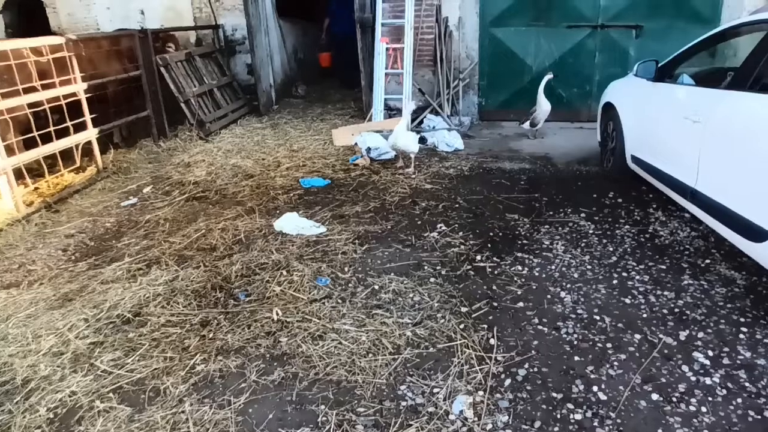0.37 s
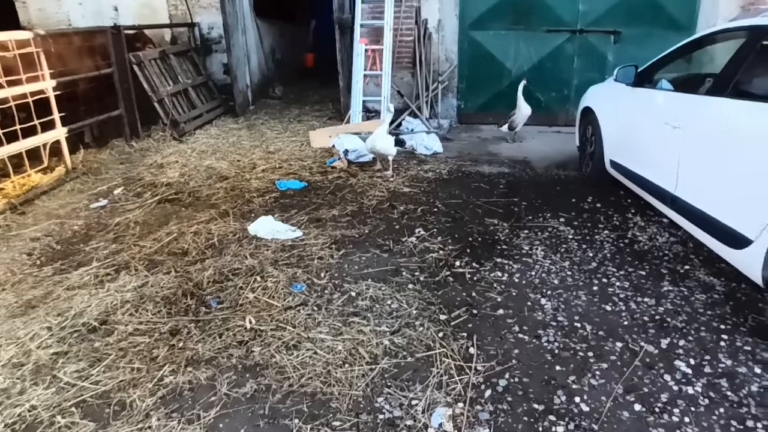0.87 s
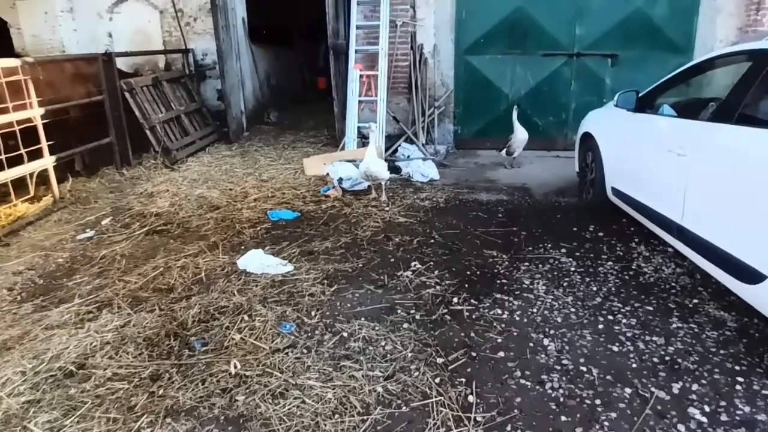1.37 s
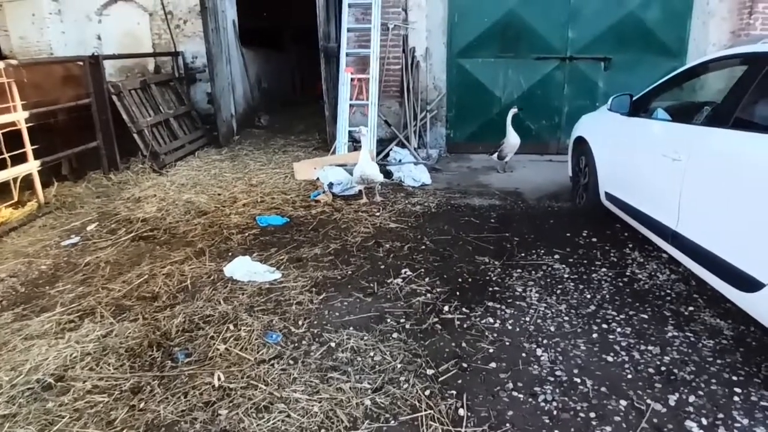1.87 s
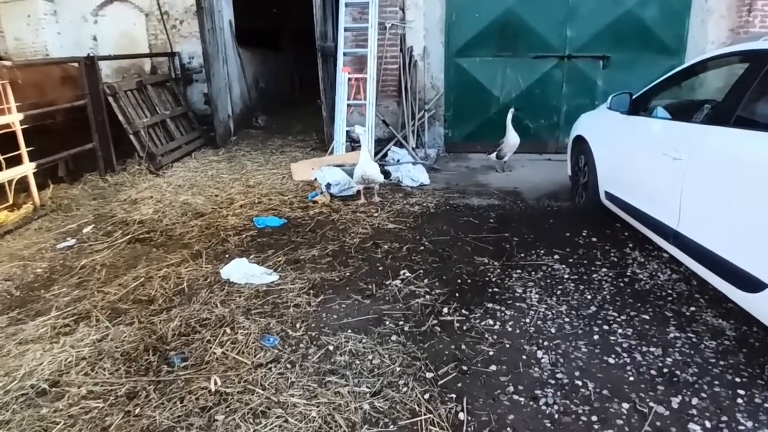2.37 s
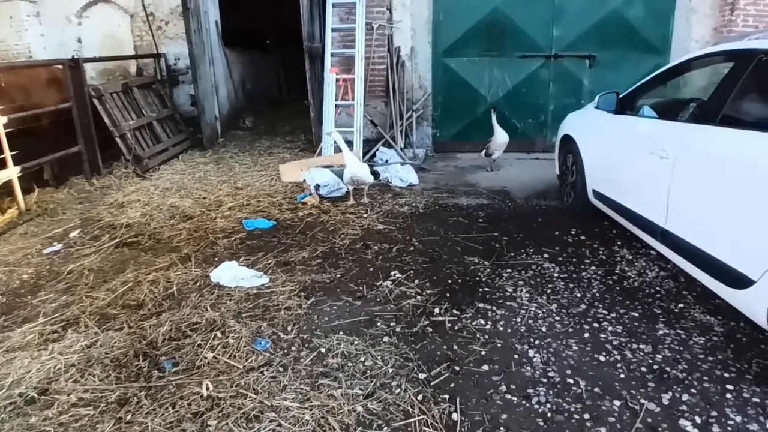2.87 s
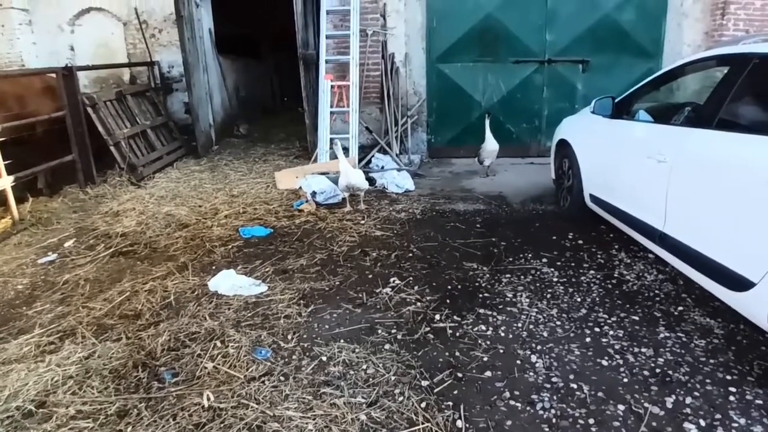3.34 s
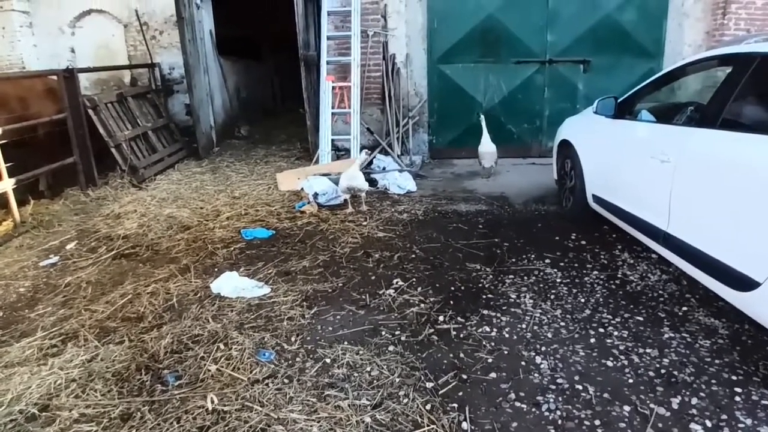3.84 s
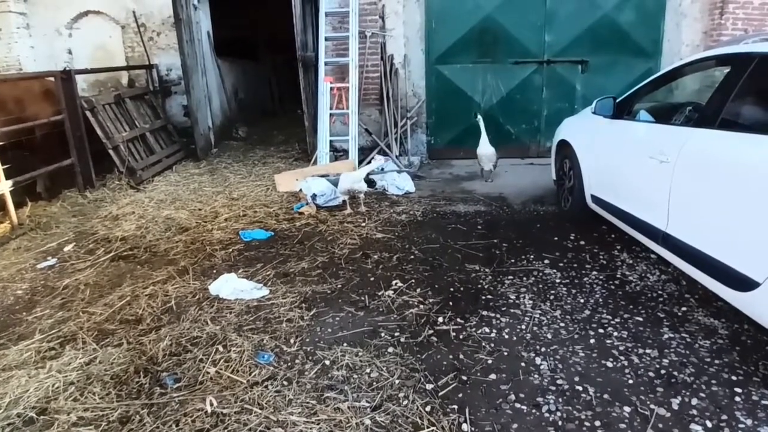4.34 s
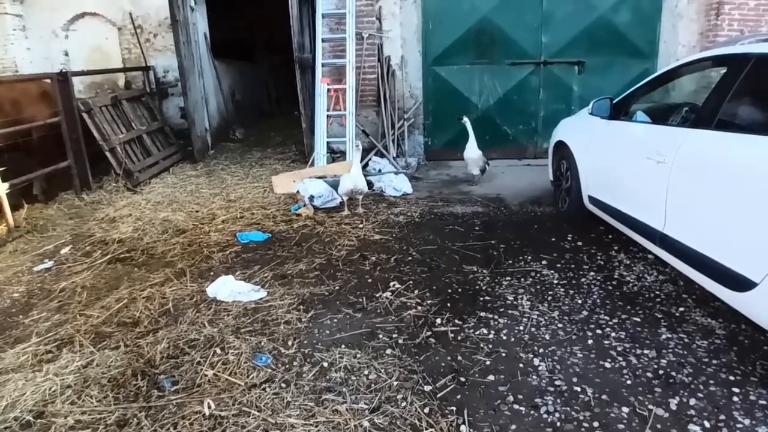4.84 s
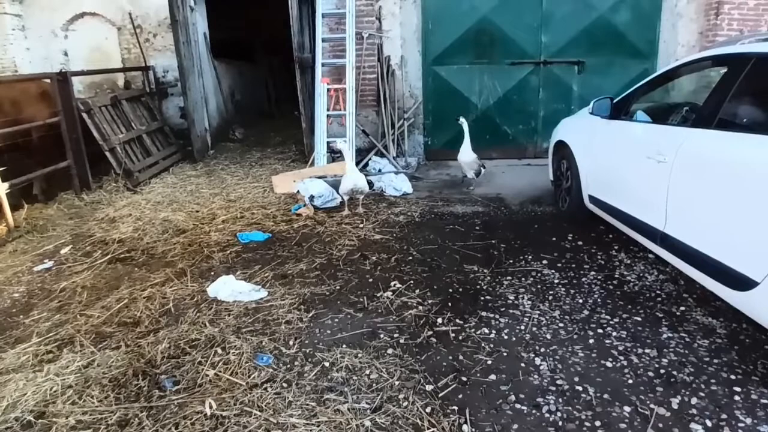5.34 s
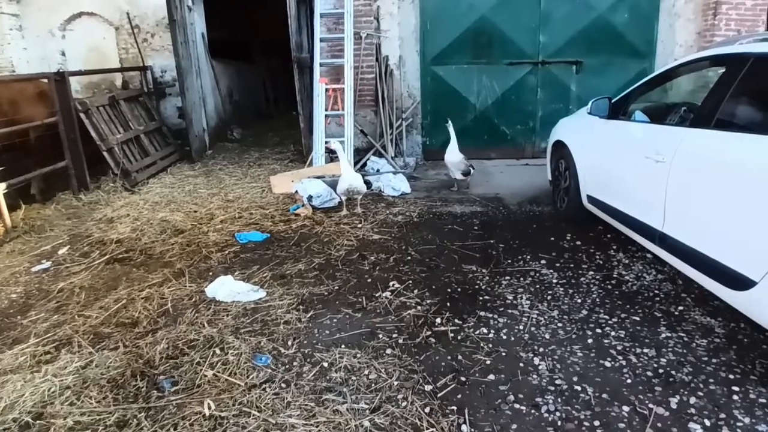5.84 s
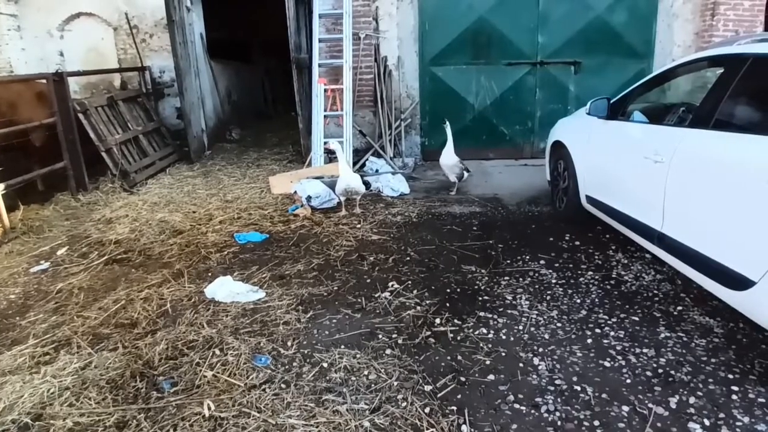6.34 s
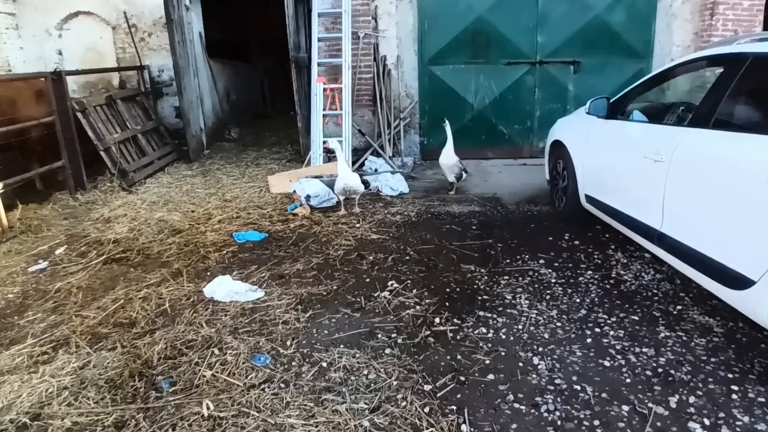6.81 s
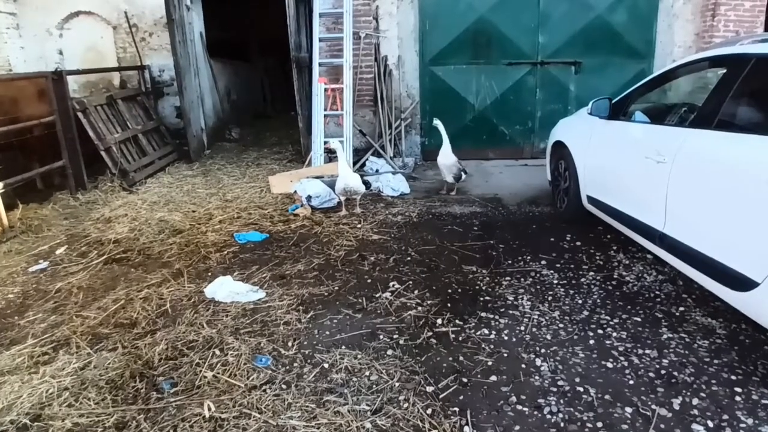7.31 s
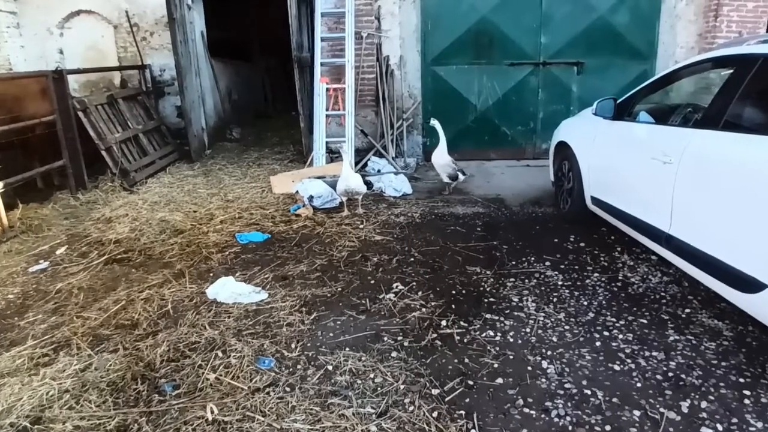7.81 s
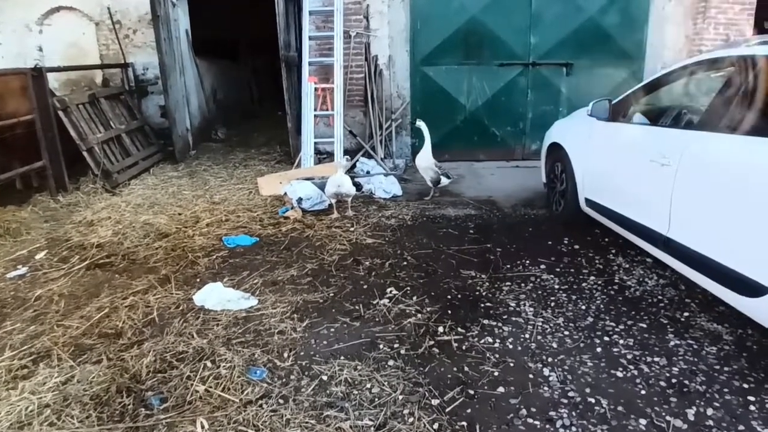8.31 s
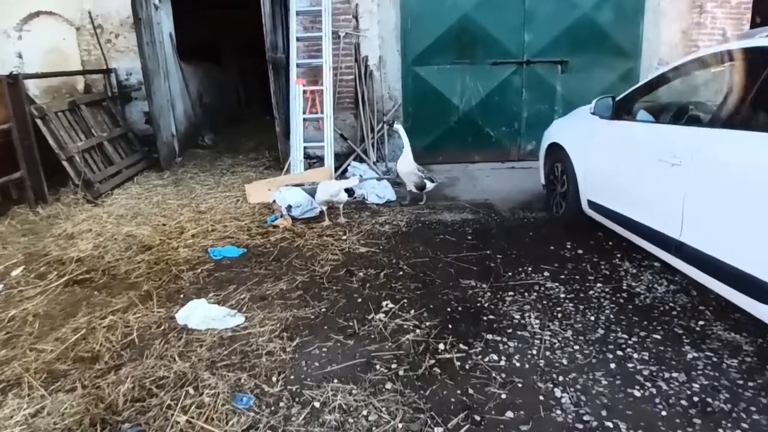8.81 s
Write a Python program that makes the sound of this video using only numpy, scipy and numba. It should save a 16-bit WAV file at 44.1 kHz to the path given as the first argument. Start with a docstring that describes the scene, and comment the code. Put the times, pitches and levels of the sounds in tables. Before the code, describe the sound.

Two geese honk loudly and harshly close by in a walled farmyard, with a short low from a calf, straw rustle and a late run of barks.

```python
"""In a walled farmyard two geese call close by, a calf lows in the pen, and straw rustles under wind and hiss.
The geese snap two membranes into a ringing windpipe, throat and beak: rolled calls, harsh honks, barks.
Wavering near-sines make windpipe tones, soft coos, low hums and small birds; the calf is pulses, nose and mouth.
Shaped noise makes wind bumps, rustle, hiss, ticks and scuffles; the walls answer with a dull tail and bright scatter."""
import sys
import numpy as np
from scipy import signal
from scipy.fft import rfft, irfft
from scipy.io import wavfile
from scipy.ndimage import uniform_filter1d, minimum_filter1d
from numba import njit

SR = 44100
rng = np.random.default_rng(int(sys.argv[2]) if len(sys.argv) > 2 else 0)


def boost(x):
    """Linear amplitude factor 10**(x/20) for a level x in decibels (scalar or array-like)."""
    u = np.asarray(x, float) / 20
    return 10 ** u


def waveform_to_disk(signal):
    """Save audio, clipped to [-1, 1], as 16-bit WAV at the path in sys.argv[1]."""
    frames = np.transpose(np.atleast_2d(signal))
    scaled = np.clip(frames, -1, 1) * 32767
    samples = np.round(scaled).astype(np.int16)
    wavfile.write(sys.argv[1], SR, samples)


N = 404838
T = np.arange(N) / SR
HZ = np.fft.rfftfreq(N, 1 / SR)

# Wind bumps on the ports. Each row: start in seconds, level in dB before a halving of the amplitude.
BUMPS = [(0.629, -62), (0.849, -45), (1.255, -56), (2.424, -62), (2.61, -50), (2.839, -47), (3.099, -52.5),
         (3.362, -61), (3.608, -39), (3.801, -42), (4.491, -51), (4.979, -48.5), (5.292, -51), (5.502, -36),
         (5.887, -43), (6.34, -38.5), (6.441, -63), (6.634, -52), (6.81, -43), (7.263, -45), (7.712, -41),
         (7.93, -42.5), (8.173, -38.5), (8.344, -41), (8.635, -43), (8.835, -58), (9.089, -42)]
# Animals stirring in the pens. Each row: time in seconds, dull rustle in dB, straw in dB.
RUSTLE = [(.5, -63.5, -44), (1.33, -51.5, -51.5), (1.55, -40.5, -39.5), (1.66, -54, -50.5),
          (3.06, -53.5, -51.5), (3.49, -56.5, -57), (3.95, -42.5, -32), (4.3, -38.5, -46),
          (4.75, -49.5, -47.5), (5.5, -52.5, -54), (5.7, -58.5, -59.5), (6.1, -56.5, -56), (6.8, -59, -57),
          (6.92, -62, -49.5), (7.1, -58.5, -55), (7.25, -49, -53), (7.45, -59.5, -57.5), (8.58, -57, -59.5),
          (8.75, -49.5, -45), (8.9, -59, -58), (9.18, -59, -51)]
# Leafy hiss. Each row: time in seconds, level in dB.
HISS = [(0.46, -84.5), (0.63, -58.5), (1.26, -63.5), (3.49, -59.5), (3.64, -55.5), (3.74, -62), (3.85, -49),
        (4.22, -61.5), (5.0, -65), (5.9, -70.5), (6.1, -65), (6.29, -52), (6.36, -62.5), (7.0, -69),
        (7.3, -64.5), (8.57, -68), (8.64, -57), (9.03, -66), (9.18, -55.5)]
# Spectra of yard and hiss, set to level later. Each row: frequency in Hz, relative density in dB per Hz.
YARD_COLOUR = [(18, -44.5), (30, -14.5), (76, 0.5), (295, -2), (399, -9.5), (648, -2), (1050, -18),
               (1490, -12), (2100, -17), (2910, -24.5), (7500, -34), (9750, -59.5), (16500, -120)]
HISS_COLOUR = [(4710, -35), (8000, -19.5), (9490, -12.5), (9690, -11.5), (10900, -1.5), (11500, -2.5),
               (13400, -18.5), (15100, -4.5), (16000, -23.5)]
# How alike the yard noise is at both ports. Each row: frequency in Hz, left-right likeness from -1 to 1.
LIKENESS = [(60, .97), (130, .95), (290, .85), (640, .4), (1410, -.1), (3100, -.2), (7000, 0)]
# Clear rolled calls, one list each. Each row: time in seconds, pulse rate in Hz, level in dB, chest hum in dB.
CLEAR = [
    [(0.48, 154.5, -76, -88), (0.554, 158.5, -37, -63), (0.622, 165.5, -19, -48),
     (0.688, 170.9, -19.5, -62), (0.725, 169.8, -22, -65), (0.74, 167.6, -31.5, -60),
     (0.78, 165.3, -40, -66)],
    [(2.112, 176.7, -67, -59), (2.135, 179.2, -31.5, -60), (2.2, 190.9, -21.5, -45.5),
     (2.264, 198.8, -20, -32), (2.336, 192, -23.5, -43.5), (2.355, 190.2, -34, -53.5),
     (2.39, 195.6, -46, -63)],
]
# Long honks, one list each. Each row: time in seconds, pulse rate in Hz, level in dB,
# brightness of the honk (0 dull, 1 bright, below 0 darker still), chest hum in dB.
LONG = [
    [(0.806, 152.6, -31.5, 0.03, -63), (0.82, 158.5, -16.5, 0.06, -37.5), (0.9, 159.9, -15, 0.64, -51),
     (0.986, 163.3, -13, 0.73, -59), (1.06, 170, -11.5, 0.5, -57.5), (1.126, 175.3, -10.5, 0.04, -50.5),
     (1.172, 149.8, -20.5, 0.04, -33), (1.24, 137.6, -57, 0, -59)],
    [(2.412, 157.7, -40, 0.18, -72), (2.428, 149.9, -9.5, 0, -41), (2.467, 160.8, -16, 0.53, -32),
     (2.567, 153.6, -18, 0.75, -64.5), (2.685, 157.7, -20, .25, -35.5)],
    [(2.69, 148.2, -10, 0.47, -29), (2.746, 155.8, -16.5, 0, -27), (2.83, 141.5, -27.5, -.2, -35),
     (2.908, 126.9, -31.5, -.4, -45), (2.942, 135.5, -35, -.4, -34), (3.02, 132.5, -50, -.5, -75)],
]
# Roughness of the calls by the ladder, in order of time. Each row: roughness 0-1 at the edges, in the middle.
LADDER_ROUGH = [(.5, .15), (.43, .8), (.52, .18), (.55, .83), (.4, .13)]
# Overall spectrum of each kind of call as heard; the barks are dull above 8 kHz.
# Each row: frequency in Hz, relative level in dB.
CLEAR_COLOUR = [(260, -62.5), (450, -32), (590, -35), (745, -16), (964, -17), (1280, 2.5), (1380, 0.5),
                (1620, -4), (1990, -15.5), (2400, -20), (2740, -21.5), (3220, -18.5), (4270, -22.5),
                (6250, -33.5), (8500, -60.5), (11000, -86.5), (18700, -120)]
LONG_COLOUR = [(260, -72), (450, -28.5), (636, -24.5), (912, -1), (1270, -7.5), (1450, -5), (1690, -34),
               (2940, -26.5), (3520, -22), (4090, -17.5), (6050, -22), (9490, -27), (11700, -17),
               (15300, -39), (16300, -49)]
BARK_COLOUR = [(240, -79), (400, -1), (1010, -11.5), (1160, -21.5), (1260, -15.5), (1360, -15.5),
               (2290, -21), (2820, -24), (3300, -23), (3660, -17), (4750, -26.5), (7120, -28.5),
               (9000, -74), (11700, -101), (19800, -120)]
# Soft coos and low hums. Each row: crest in seconds, rise in seconds, fall in seconds, pitch in Hz, level in dB.
COOS_AND_HUMS = [(0.726, .07, 0.024, 504.6, -40.5), (2.5, .05, 0.15, 442, -39), (3.8, .07, .09, 187.8, -33),
                 (4.91, .02, .03, 862, -50), (5.12, .03, .03, 675, -53), (5.3, .03, 0.027, 546, -54),
                 (6.2, .03, 0.064, 804.6, -47.5), (6.53, 0.074, 0.11, 539, -48.5),
                 (7.132, .1, .06, 113.1, -45.5), (7.21, .03, .04, 715, -53),
                 (7.458, .035, 0.049, 697, -49.5), (8.41, 0.081, 0.11, 693, -52.5)]
# Tones ringing in the windpipe. Each row: crest in seconds, rise in seconds, fall in seconds,
# pitch at the crest in Hz, level in dB, octave above in dB relative to that level.
PIPE_TONES = [(0.878, 0.052, 0.059, 823.3, -10.5, -29), (0.966, 0.12, 0.067, 1072, -2.5, -34),
              (1.02, 0.16, 0.065, 1493, 0.5, -9.5), (1.1, 0.039, 0.076, 955, -2.5, -25),
              (2.482, 0.065, 0.19, 1159, -15.5, -27.5), (2.616, .1, 0.088, 1451, -8.5, -8),
              (2.65, 0.031, .1, 936.4, -7, -30), (3.845, .04, 0.018, 902, -19.5, -26),
              (7.75, .06, .13, 1280, -29.5, -24), (7.764, .085, 0.031, 981, -17.5, -25)]
# Barks. Each row: start in seconds, time held in seconds (stretched if very short), crest level in dB,
# throat resonance in Hz, beak resonance in Hz, brightness in dB.
BARKS = [(1.25, .05, -35, 1197, 2600, -1.5), (1.43, 0.055, -37, 690, 2650, 2.5),
         (1.885, 0.062, -35.5, 800, 2650, -5), (3.305, 0.068, -11.5, 867, 2220, -1),
         (3.535, .09, -18.5, 921, 2150, 0.5), (3.732, .022, -23.5, 1440, 2081, -5.5),
         (3.764, 0.071, -21, 784, 2223, 7), (4.006, 0.032, -13.5, 1570, 1920, -3.5),
         (6.607, .025, -31.5, 735, 2280, -12.5), (7.67, .11, -15, 991, 2597, 0.5),
         (8.205, 0.04, -35.5, 701, 2820, -14.5), (8.636, 0.059, -28.5, 704, 2100, 2),
         (8.729, 0.11, -44, 757, 2050, -16), (8.944, .05, -27, 667, 2230, -4.5),
         (9.071, 0.041, -34.5, 876, 2090, 0), (9.135, 0.064, -21, 725, 2215, -4)]
# Shoving in the straw. Each row: start of the held part in seconds, time held in seconds, level in dB.
SCUFFLE = [(1.47, 0.069, -34), (2.701, 0.1, -36.5), (2.929, 0.0373, -33), (3.638, 0.0043, -37),
           (3.94, 0.0095, -39)]
# Ticks and scuffs of feet and straw. Each row: start in seconds, level in dB before a halving of the amplitude,
# nominal centre in Hz, time to fall 60 dB in seconds.
TICKS = [(1.598, -47, 5000, 0.3), (1.7094, -39, 8920, 0.074), (1.7535, -39.5, 11840, 0.049),
         (1.7714, -37, 11620, 0.049), (3.1826, -32, 6090, 0.14), (3.263, -36, 1600, .09),
         (3.659, -34, 2117, 0.07), (3.926, -13, 1601, 0.083), (4.9938, -35.5, 1930, 0.086),
         (5.4252, -35, 2880, 0.21), (5.7114, -38, 1380, 0.31), (5.9366, -44, 1540, 0.0694),
         (6.1413, -45.5, 1950, 0.17), (6.343, -35.5, 11820, 0.039), (6.6134, -32, 1690, 0.088),
         (6.7216, -39.5, 1540, 0.099), (6.8563, -35.5, 4920, 0.39), (7.1392, -34, 8020, 0.17),
         (7.5792, -47, 10630, 0.082), (8.4002, -50, 1900, 0.072)]
# Far small birds. Each row: crest in seconds, rise in seconds, fall in seconds, pitch at the crest in Hz, level in dB.
CHIRPS = [(1.62, 0.031, 0.0464, 5300, -50.5), (1.69, 0.033, .03, 4450, -53.5),
          (6.482, .03, 0.053, 3160, -65.5), (7.37, .08, .11, 3388, -63.5), (8.23, .02, 0.037, 2655, -50.5)]
# The calf. Each row: time in seconds, pitch in Hz, nasal hum in dB, open mouth in dB.
CALF = [(3.66, 95.8, -75, -65), (3.704, 98.9, -62.5, -72), (3.804, 109.2, -86, -78),
        (3.89, 126.3, -45.5, -32.5), (3.94, 132, -33.5, -33.5), (4.234, 146.3, -30.5, -29),
        (4.43, 151.1, -27.5, -29), (4.598, 142.7, -35.5, -41.5), (4.72, 124.5, -69, -48)]
# Spectrum of the calf's low. Each row: frequency in Hz, relative level in dB.
CALF_COLOUR = [(76, -45), (130, -32), (208, -30), (303, 2), (450, -6), (674, -40), (845, -11.5), (1010, -6),
               (1160, 5.5), (1520, 13), (1690, -10), (1970, 14.5), (2260, -5.5), (2700, -7.5), (3050, -29),
               (4800, -33.5), (6240, -71), (10600, -120)]
# Port phase for each place. Each row: frequency in Hz, lead of the left port in radians.
LADDER_PHASE = [(0, 0), (430, -.3), (1810, 2.0), (2930, 2.3), (4050, 1.3), (5860, 2.2), (8010, 6.6),
                (16000, 11)]
GATE_PHASE = [(0, 0), (1640, .6), (3700, -.7), (5770, .3), (16000, .3)]
PEN_PHASE = [(0, 0), (1000, -.5), (2580, -1.5), (3500, -2.4), (16000, -12)]
# Port balance for each place. Each row: frequency in Hz, left minus right in dB.
LADDER_BALANCE = [(60, -0.5), (110, -0.5), (200, -0.5), (380, -0.5), (700, -3.0), (1290, -1.5), (2380, 3.5),
                  (4400, 0.5), (8120, -5.0), (15000, -6.5)]
GATE_BALANCE = [(60, -0.5), (110, -0.5), (200, 0.5), (380, -0.5), (700, 0.0), (1290, 1.0), (2380, 4.0),
                (4400, 0.5), (8120, -3.0), (15000, -4.5)]
PEN_BALANCE = [(60, -1.5), (110, -1.0), (200, 0.0), (380, 1.0), (700, -2.0), (1290, -1.5), (2380, 1.0),
               (4400, 0.5), (8120, -2.5), (15000, -4.5)]

OPPOSITE = np.array([[1], [-1]])  # one signal in opposite polarity at the two ports


def unit(x):
    """Scale to rms 1."""
    return x / np.sqrt(np.mean(x ** 2) + 1e-18)


def on_log(table):
    """Read a (Hz, value) table at every frequency, straight on a log axis."""
    hz, value = np.transpose(table)
    return np.interp(np.log(HZ + 1), np.log(hz + 1), value)


def colour(x, table):
    """Filter by a (Hz, dB) table."""
    return irfft(rfft(x) * boost(on_log(table)), N)


def band(x, lo_hz, hi_hz):
    """Steep band-pass."""
    return signal.sosfilt(signal.butter(3, [lo_hz, hi_hz], "band", fs=SR, output="sos"), x)


def steady(x):
    """Even out the slow level, keep the pulses."""
    power = uniform_filter1d(uniform_filter1d(x ** 2, size=1300), size=1300)
    return x / np.sqrt(power + 1e-12)


def walk(rate):
    """Random levels held 1 / rate seconds and slewed twice; spread near 1."""
    k = int(SR / rate)
    held = np.repeat(rng.standard_normal(N // k + 1), k)
    return 1.3 * uniform_filter1d(uniform_filter1d(held, k), k)[:N]


def played(calls, tail_s=0.0097):
    """Columns of a list of calls as curves, and a gate that is open during the calls."""
    s, *columns = np.transpose(np.concatenate(calls))
    gate = np.zeros(N)
    for call in calls:
        start, end = call[0][0], call[-1][0]
        gate += np.interp(T, [start - .004, start, end, end + tail_s], [0, 1, 1, 0])
    return [np.interp(T, s, c) for c in columns], np.minimum(gate, 1)


def gusts():
    """Level curve of the wind: low and steady, with bumps that rise quickly and die away."""
    wind_db, rise_s, t60_s = -65.5, 0.027, .4
    t, starts = T[:SR], np.zeros(N)
    s, level_db = np.transpose(BUMPS)
    starts[(s * SR).astype(int)] = .5 * boost(level_db)
    shape = np.minimum(t / rise_s, 1) * boost(-60 * np.maximum(t - rise_s, 0) / t60_s)
    return boost(wind_db) + signal.fftconvolve(starts, shape)[:N]


def crackle():
    """Dry straw: scattered clicks of very uneven size, each smeared into a short hiss."""
    clicks_per_s, spread_db, t60_s = 36, 6, .03
    size = boost(spread_db * np.minimum(rng.exponential(size=N), 3))
    clicks = (rng.random(N) < clicks_per_s / SR) * size
    smeared = signal.lfilter([1], [1, -boost(-60 / (t60_s * SR))], clicks)
    return smeared * rng.standard_normal((2, N))


def yard():
    """Wind bumps below, rustle in the middle, hiss on top; half-octave noise bands flicker on their own."""
    (hiss_db,), _ = played([HISS])
    (dull_db, straw_db), _ = played([RUSTLE])
    like = np.clip(on_log(LIKENESS), -1, 1)
    # the more alike the ports, the more mid and the less side
    mid, side = (rfft(rng.standard_normal(N)) * boost(on_log(YARD_COLOUR)) * np.sqrt(1 + sign * like)
                 for sign in (1, -1))
    pair = irfft(np.array([mid + side, mid - side]), N)
    wind = gusts() * boost(1.3 * walk(8.1)) * unit(band(pair, 44, 81))
    bands = [boost(3.2 * walk(9)) * band(pair, hz, hz * np.sqrt(2)) for hz in 100 * 2 ** np.arange(0, 6.5, .5)]
    dull, straw = unit(sum(bands[:6])), unit(sum(bands[6:]))
    hiss = unit(colour(rng.standard_normal((2, N)) + boost(-6) * unit(crackle()), HISS_COLOUR))
    hiss_level = boost(hiss_db + 0.8 * walk(26) + 1.7 * walk(7.9))
    return wind + boost(dull_db) * dull + boost(straw_db) * straw + hiss_level * hiss


@njit
def ring(x, hz, width):
    """Resonance with a moving centre and a width in Hz: a state-variable band-pass."""
    y, b, l = np.empty(len(x)), 0., 0.
    for i in range(len(x)):
        g, k = np.tan(np.pi * hz[i] / SR), width / hz[i]
        v = (b + g * (x[i] - l)) / (1 + g * (g + k))
        b, l, y[i] = 2 * v - b, l + 2 * g * v, k * v
    return y


def snapping(hz, on):
    """One snap per cycle; upper partials leave the long neck out of step, which blunts it."""
    turns, snaps = np.cumsum(hz) / SR, np.zeros(N)
    offsets = 1.76 * np.cumsum(rng.standard_normal(80)) / 2
    partials = range(1, int(8000 / hz[on].mean()))
    snaps[on] = unit(sum(np.cos(2 * np.pi * k * turns[on] + offsets[k]) for k in partials))
    return snaps, turns


def membranes(hz, rough, on):
    """The leading membrane, and the harsh part: its partner beating out of tune plus puffs of air."""
    snaps, turns = snapping(hz * (1 + .053 * rough * walk(90)), on)
    partner, _ = snapping(hz * (1.37 + .035 * walk(45)), on)
    air = unit(np.exp(-(turns % 1) / .94) * rng.standard_normal(N))  # each puff fades over its cycle
    harsh = .8 * partner * boost(4 * walk(120)) + .75 * air
    return snaps * boost(5 * rough * walk(150)), harsh, turns


def goose(calls, shape, rough, width_hz, ring_db, beak_width_hz, beak_ring_db, pipe_db,
          pipe_hz=None, head=None, hollow=None):
    """Snaps through a windpipe that rings on multiples of its lowest mode, throat and beak; the chest hums."""
    (hz, level_db, throat_hz, beak_db, beak_hz, rasp_db, chest_db), gate = played(calls)
    snaps, harsh, turns = membranes(hz, rough, gate > 0)
    snaps, harsh = colour(snaps, shape), colour(harsh, shape)
    voice = (1 - rough) * snaps + rough * harsh
    # a stretched neck holds the pipe near one pitch; without a given pitch it follows the throat
    pipe = throat_hz if pipe_hz is None else pipe_hz * (1 + .035 * walk(12))
    # each mode wanders and flickers on its own; higher ones are wider
    modes = (boost(5 * walk(25)) * ring(voice, k * pipe * (1 + .03 * walk(20)), 60. * k + 40)
             for k in range(2, 7))
    voice = voice + boost(pipe_db) * sum(modes)
    low, middle = band(voice, 510, 1900), band(voice, 1800, 2484)
    if hollow:
        low = low - hollow * ring(low, .5 * throat_hz, 500.)  # little sound leaves below the throat resonance
    throat = steady(low + boost(ring_db) * ring(low, throat_hz, float(width_hz)))
    narrow = ring(ring(middle, beak_hz, float(beak_width_hz)), beak_hz, float(beak_width_hz))
    beak = boost(beak_db) * steady(middle + boost(beak_ring_db) * narrow)
    treble = signal.sosfilt(signal.butter(3, 3400, "high", fs=SR, output="sos"), voice)
    rasp = boost(rasp_db) * steady(treble)
    # the head rings (Hz, dB at full scale, dB per dB of level): more in loud calls
    if head:
        head_hz, full_db, per_db = head
        skull = steady(ring(voice, head_hz * (1 + .01 * walk(18)), 180.))
        rasp = rasp + boost(rasp_db + full_db + per_db * level_db) * skull
    chest = np.sqrt(2) * boost(chest_db) * np.sin(2 * np.pi * turns)
    return gate * (boost(level_db) * (throat + beak + rasp) + chest)


def roughness():
    """Each call of the goose by the ladder moves from its edge roughness to its middle one and back."""
    spans, edge_s = sorted((c[0][0], c[-1][0]) for c in CLEAR + LONG), .07
    points = []
    for (start, end), (edge, middle) in zip(spans, LADDER_ROUGH):
        points += [(start, edge), (start + edge_s, middle), (end - edge_s, middle), (end, edge)]
    return np.interp(T, *np.transpose(points))


def clear(rows):
    """Throat and rasp of a clear call follow its effort; the beak rings bright at the onset and settles."""
    s, hz, level_db, chest_db = np.transpose(rows)
    below_db = np.maximum(-16 - level_db, 0)  # how far below full effort
    throat_hz = 1395 - 7 * below_db
    beak_db = -15 + 31 * np.exp(-(s - s[0]) / .06)
    beak_hz = 2138 + 0 * s
    rasp_db = -15 - 0.24 * below_db
    return np.transpose([s, hz, level_db, throat_hz, beak_db, beak_hz, rasp_db, chest_db])


def swells(rows, edge_db, glide=0.):
    """A tone swells to its crest and fades, gliding by a fraction of its pitch; a further column is its octave."""
    out = []
    for s, rise, fall, hz, level_db, *octave_db in rows:
        tone = []
        for t, g, e in ((-rise, -glide, edge_db), (0, 0, 0), (fall, glide, edge_db)):
            tone.append((s + t, hz * (1 + g), level_db + e, *(level_db + e + o for o in octave_db)))
        out.append(tone)
    return out


def tones(tables, waver, flutter_db):
    """Wavering near-sines; each further level column is the next partial."""
    drift, flutter, out = 1 + waver * walk(60), np.sqrt(2) * boost(flutter_db * walk(70)), np.zeros(N)
    for rows in tables:
        s, *columns = np.transpose(rows)
        on = slice(int((s[0] - .004) * SR), int((s[-1] + .012) * SR))
        hz, *partial_db = (np.interp(T[on], s, c) for c in columns)
        gate = np.interp(T[on], [s[0] - .004, s[0], s[-1], s[-1] + .012], [0, 1, 1, 0])
        angle = 2 * np.pi * np.cumsum(hz * drift[on]) / SR
        partials = sum(boost(db) * np.sin((k + 1) * angle) for k, db in enumerate(partial_db))
        out[on] += gate * flutter[on] * partials
    return out


def coos_and_hums():
    """Soft coos and low hums: a wavering near-sine with a faint octave, 21 dB down."""
    return tones(swells([(*row, -21) for row in COOS_AND_HUMS], -12), .012, 3)


def honk(rows):
    """A brighter honk has a higher throat resonance, a stronger, lower beak resonance and more rasp."""
    s, hz, level_db, brightness, chest_db = np.transpose(rows)

    def law(dull, bright):
        return dull + (bright - dull) * np.clip(brightness, -.5, 1.3)

    throat_hz, beak_db, beak_hz, rasp_db = law(960, 1440), law(-10, 9), law(2284, 2070), law(-26, 9)
    return np.transpose([s, hz, level_db, throat_hz, beak_db, beak_hz, rasp_db, chest_db])


def pipe_tones():
    """The windpipe rings in fluttering tones that glide upward through their crest."""
    return tones(swells(PIPE_TONES, -26, 0.036), 0.0099, 4.8)


def barks():
    """A quick onset, a swell to the crest, a short release in which the throat sags; the next bark cuts it short."""
    attack_s, crest, full_release_s, sag = .015, .6, .055, 0.057  # crest and sag are fractions
    start_db, onset_db, held_db, end_db = -23.5, -4, -7.5, -43  # relative to the crest
    out = []
    next_starts = [row[0] for row in BARKS[1:]] + [np.inf]
    for (s, held, peak_db, throat_hz, beak_hz, bright_db), after in zip(BARKS, next_starts):
        held = max(held, attack_s / crest * 1.2)
        release = np.clip(after - s - held - .002, .002, full_release_s)
        last_db = held_db + release / full_release_s * (end_db - held_db)
        t = np.array([0, attack_s, crest * held, held, held + release])
        level_db = peak_db + np.array([start_db, onset_db, 0, held_db, last_db])
        pulse_hz = 152.4 + 12 * t / t[-1]
        sagging_hz = throat_hz * (1 - sag * (t > held))
        even = np.ones(len(t))
        out.append(np.transpose([s + t, pulse_hz, level_db, sagging_hz, (-6 + bright_db) * even,
                                 beak_hz * even, (-15 + bright_db) * even, level_db - 41.5]))
    return out


def scuffle():
    """A body shoves through the straw: dull noise in uneven jolts."""
    rise_s, fall_s, edge_db = .045, .07, -20
    shoves = []
    for s, held, db in SCUFFLE:
        end = s + held
        shoves.append([(s - rise_s, db + edge_db), (s, db), (end, db), (end + fall_s, db + edge_db)])
    (level_db,), gate = played(shoves)
    noise = rng.standard_normal((2, N))
    jolts = (noise[0] + 0.32 * noise[1] * OPPOSITE) * boost(3.1 * walk(55))
    return gate * boost(level_db) * (unit(band(jolts, 180, 800)) + boost(-6) * unit(band(jolts, 800, 2100)))


def ticks():
    """Feet and straw tick: each a wide burst of noise round its centre, dying away."""
    out = np.zeros((2, N))
    for s, level_db, hz, t60 in TICKS:
        i = int(s * SR)
        t = np.arange(min(SR // 4, N - i)) / SR
        noise = rng.standard_normal((2, SR // 4))[:, :len(t)]
        burst = band(noise, hz / 2.5, min(hz * 1.45, .36 * SR))
        shape = np.minimum(t / 0.00046, 1) * boost(-60 * t / np.clip(t60, .01, .6))
        out[:, i:i + len(t)] += .5 * boost(level_db) * unit(burst) * shape
    return out


def chirps():
    """Far small birds: single wavering tones that glide slightly downward."""
    return tones(swells(CHIRPS, -12, -.015), .016, 6)


def calf():
    """Nearly smooth pulses with a little breath; nasal hum and open mouth each follow their own level."""
    (hz, nose_db, mouth_db), gate = played([CALF], tail_s=0.08)
    snaps, air, _ = membranes(hz, .05, gate > 0)
    voice = colour(snaps + .04 * air, CALF_COLOUR)
    nose, mouth = steady(band(voice, 80, 620)), steady(band(voice, 700, 6000))
    return gate * (boost(nose_db) * nose + boost(mouth_db) * mouth)


def place(x, phase, balance):
    """The two ports hear a direction with their own phase and level."""
    hz, radians = np.transpose(phase)
    half = boost(on_log(balance) / 2) * np.exp(.5j * np.interp(HZ, hz, radians))
    # the sum of both ports keeps the level of the source, except where they nearly cancel
    both = np.maximum(np.abs(half + 1 / half) / 2, .35)
    return irfft(rfft(x) / both * np.array([half, 1 / half]), N)


def walls(x):
    """Brick, gate and car send back a short dull tail and a quick bright scatter."""
    tail_t60_s, tail_db, tail_top_hz, shared_hz = 0.2, -10.5, 6500, 800
    scatter_t60_s, scatter_db, scatter_hz = .05, -0.5, 2800
    t = np.arange(SR // 2) / SR
    mid, side, *ports = rng.standard_normal((4, len(t)))
    # the bass of the tail is mostly shared by the ports
    apart = band(side, shared_hz, tail_top_hz) + boost(-8.5) * band(side, 300, shared_hz)
    tail = band(mid, 480, tail_top_hz) + apart * OPPOSITE
    tail = tail * boost(-60 * t / tail_t60_s) * (t > .012)
    # near surfaces scatter the treble differently to each port
    scatter = band(np.array(ports), scatter_hz, 16000) * boost(-60 * t / scatter_t60_s) * (t > .002)
    both = sum(boost(db) * v / np.sqrt(np.sum(v ** 2) / 2) for db, v in ((tail_db, tail), (scatter_db, scatter)))
    return signal.fftconvolve(x[None], both, axes=1)[:, :N]


def scene():
    """Two geese, soft coos, low hums and birds, the calf, their echo and the yard."""
    rough = roughness()
    ladder = goose([clear(c) for c in CLEAR], CLEAR_COLOUR, rough, width_hz=340, ring_db=1,
                   beak_width_hz=310, beak_ring_db=5.1, pipe_db=0)
    ladder = ladder + goose([honk(c) for c in LONG], LONG_COLOUR, rough, width_hz=67, ring_db=3.4,
                            beak_width_hz=130, beak_ring_db=2.7, pipe_db=6.1, pipe_hz=978)
    ladder = ladder + pipe_tones()
    gate = goose(barks(), BARK_COLOUR, rough=.48, width_hz=50, ring_db=46, beak_width_hz=150,
                 beak_ring_db=6.5, pipe_db=6.3, head=(3280, 12, .5), hollow=1.0)
    gate = gate + coos_and_hums() + chirps()
    pen = calf()
    near = place(ladder, LADDER_PHASE, LADDER_BALANCE) + place(gate, GATE_PHASE, GATE_BALANCE)
    near = near + place(pen, PEN_PHASE, PEN_BALANCE)
    echo = walls(ladder + gate + 3.26 * pen)  # the calf is heard more by way of the walls
    return near + echo + ticks() + scuffle() + yard()


def low_pass(x):
    """Removes everything above the highest recorded frequency."""
    return signal.sosfilt(signal.butter(12, 16520, fs=SR, output="sos"), x)


def record(dry):
    """The sound fades in; a limiter turns down peaks above 1.3 of full scale, and tips over full scale clip."""
    start_s, fade_s = 0.447, 0.063
    fade = np.clip((T - start_s) / fade_s, 0, 1) ** 2
    room_left = minimum_filter1d(1 / np.maximum(np.abs(dry).max(axis=0) / 1.3, 1), size=900)
    gain = uniform_filter1d(room_left, size=900)
    return low_pass(np.clip(dry * fade * gain, -1, 1))


dry = scene()
out = record(dry)
waveform_to_disk(out)
```